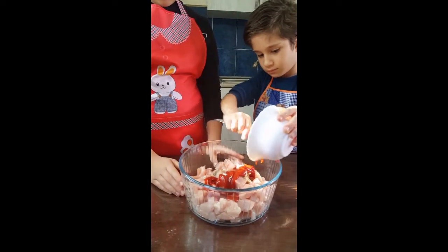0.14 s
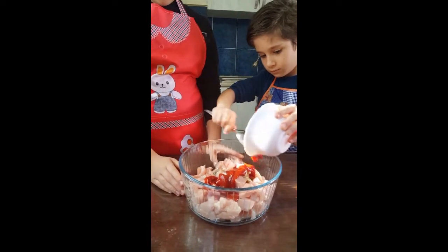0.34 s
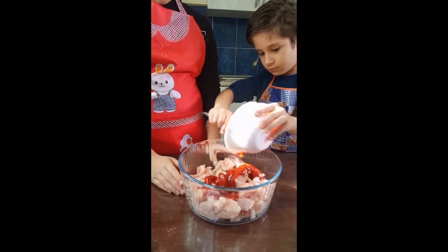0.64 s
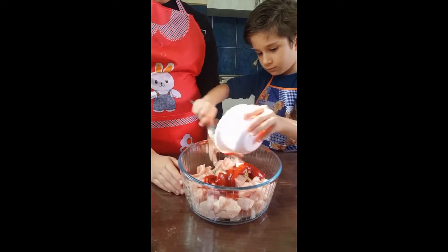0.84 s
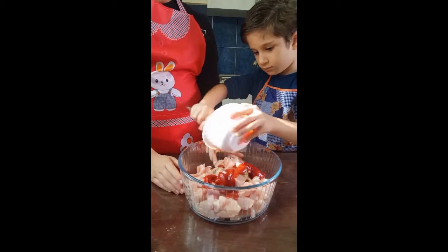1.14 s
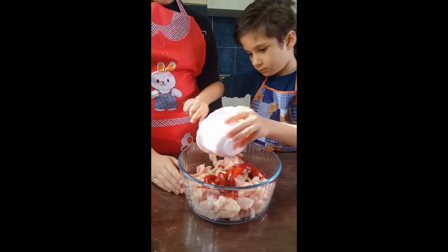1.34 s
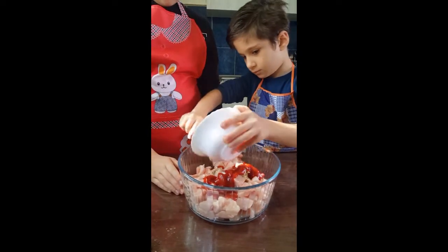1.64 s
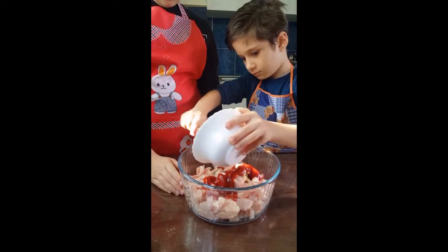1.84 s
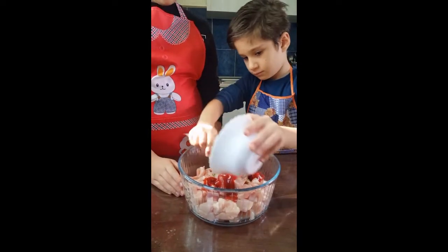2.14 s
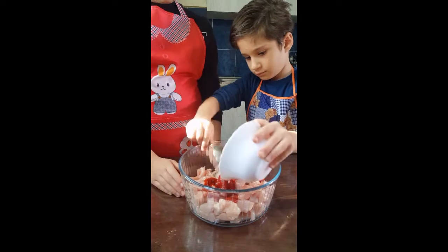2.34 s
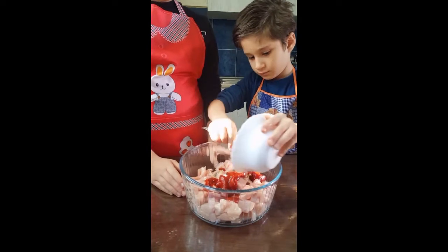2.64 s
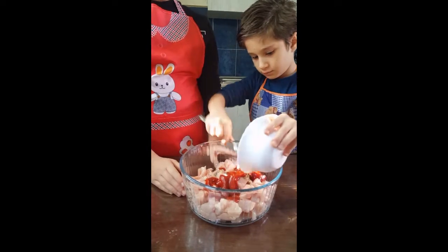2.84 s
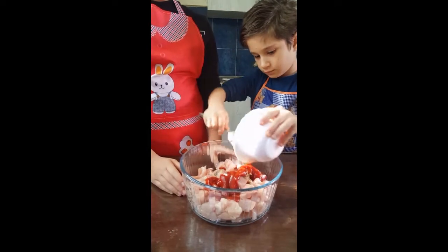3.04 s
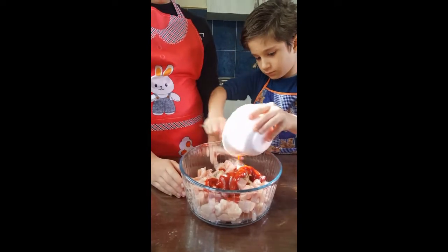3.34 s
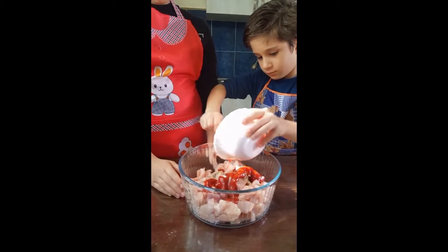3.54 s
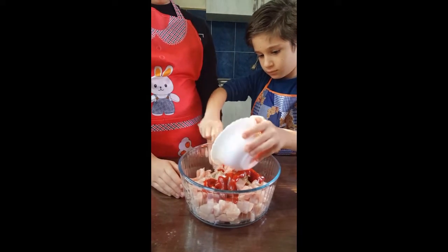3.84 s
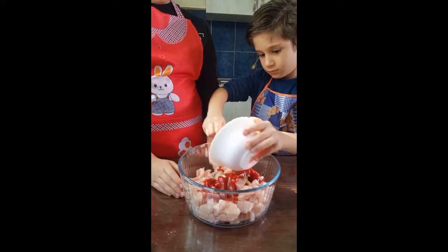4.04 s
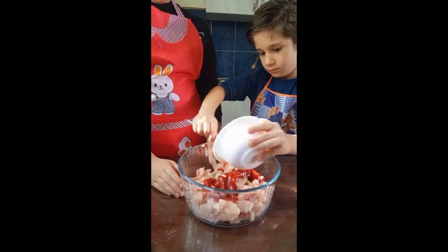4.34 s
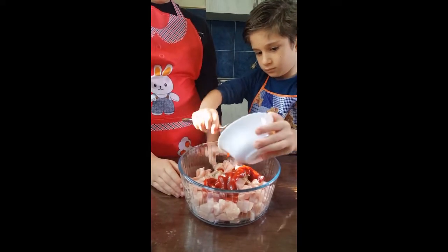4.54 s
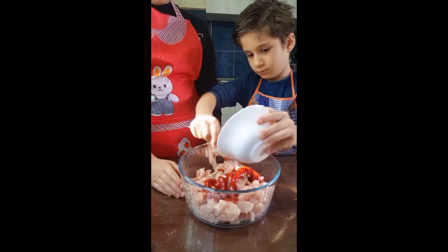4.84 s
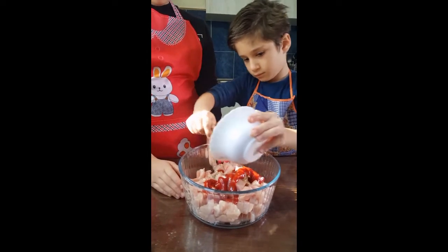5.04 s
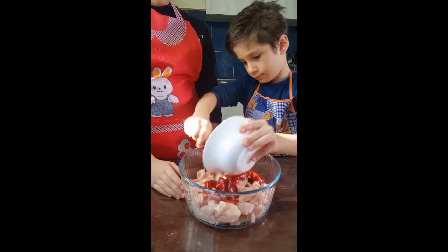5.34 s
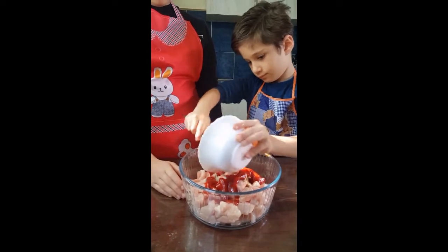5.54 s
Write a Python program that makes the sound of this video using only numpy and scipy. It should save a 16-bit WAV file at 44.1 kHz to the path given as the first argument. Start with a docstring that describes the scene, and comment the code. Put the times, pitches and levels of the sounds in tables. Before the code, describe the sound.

A close stereo phone pickup in a tiled home kitchen, about five and a half seconds. A faint, steady low appliance hum lies underneath. At 0.2-0.3 s a metal spoon knocks twice inside a hand-held china bowl, with short gritty scrapes, while a glass bowl on the table is nudged and rings low and soft. Single clear clinks follow at 0.7 and 1.2 s, a pair near 1.6, then two near 2.1-2.3, the second very faint. Light uneven taps cluster at 2.7-2.95, with a faint glass nudge at 3.0. Firm clinks come at 3.3, 3.8 (with a brighter rim ring near 3.2 kHz) and 4.2, with little scrapes around 3.5 and 4.3-4.45. A rapid clatter at 4.8 leads to the hardest knock at 4.94; double taps follow at 5.2 and 5.3, then a last light tap and scrape at 5.5. Rings are short and finger-damped, with quick hard-wall echoes and a half-second tail.

```python
"""A metal spoon taps and scrapes the inside of a hand-held china bowl in a tiled kitchen.
Each tap sums short damped body modes, longer rim modes and spoon modes; scrapes drive the same modes with gritty noise.
A glass bowl on the table, nudged early on and again midway, rings low as decaying sines.
Hard walls give two early echoes and a diffuse tail of about half a second; shaped noise makes the appliance hum."""
import sys
import numpy as np
from scipy import signal
from scipy.fft import rfft, irfft, next_fast_len
from scipy.io import wavfile
from scipy.ndimage import uniform_filter1d

SR = 44100
rng = np.random.default_rng(int(sys.argv[2]) if len(sys.argv) > 2 else 0)


def waveform_to_disk(signal):
    """Save audio, clipped to [-1, 1], as 16-bit WAV at the path in sys.argv[1]."""
    frames = np.transpose(np.atleast_2d(signal))
    scaled = np.clip(frames, -1, 1) * 32767
    samples = np.round(scaled).astype(np.int16)
    wavfile.write(sys.argv[1], SR, samples)


N = 251370
T = np.arange(SR // 2) / SR  # time axis of one ring, s

# Spoon taps: t/s, body/dB, rim/dB, spoon/dB (all relative), landing depth (scaled by family), rim ring f/Hz
TAPS = [(0.2251, -20, -41, -39.5, 3, 3120), (0.2929, -29, -25.5, -31.5, 5, 3213),
        (0.7198, -23, -17, -22.5, -5, 3202), (1.2156, -15.5, -15.5, -18, 2, 3240),
        (1.5705, -19.5, -33.5, -16.5, 7, 3299), (1.6841, -16.5, -17, -21, -2.5, 3278),
        (2.0951, -18.5, -26.5, -21, 6, 3190), (2.2985, -50, -43, -69.5, -9.5, 3160),
        (2.3095, -64, -39.5, -64, 3, 3230), (2.353, -45, -34, -52, 4, 3182),
        (2.6741, -31, -43.5, -22, 9.5, 3250), (2.73, -18.5, -31.5, -33, -1, 3310),
        (2.7695, -31, -34, -57, 2.5, 3246), (2.9345, -44, -29.5, -51, -11, 3250),
        (2.9458, -41, -32.5, -39, 0.5, 3240), (3.3038, -15.5, -20.5, -24.5, 3.5, 3240),
        (3.5031, -35.5, -28, -42, -8, 3180), (3.7646, -25.5, -9, -16.5, -7, 3239),
        (3.952, -45, -36, -58.5, -6.5, 3195), (4.229, -22.5, -14.5, -20, -4.5, 3214),
        (4.2594, -40, -34, -45, 5, 3300), (4.4514, -42, -28, -39, 4.5, 3237),
        (4.7879, -26, -16, -24.5, 3, 3219), (4.8031, -24, -42, -36, 1, 3270),
        (4.8344, -19, -21.5, -12.5, 7.5, 3400), (4.843, -22.5, -45, -27, 6, 3260),
        (4.938, -10.5, -17.5, -11.5, -3.5, 3190), (5.21, -18, -34, -13.5, 8.5, 3235),
        (5.218, -29, -50, -19, 7.5, 3235), (5.2943, -19.5, -26, -33, 2.5, 3250),
        (5.3026, -25.5, -36, -42, 3.5, 3270), (5.4993, -36, -22.5, -55, 0.5, 3195)]
# Modes of china bowl and spoon: family index, relative level/dB, free t60/s, left minus right/dB
CHINA_MODES = [(0, 3, 0.024, -2), (0, 4, 0.02, -7), (1, -2, 0.0083, -16.5), (1, 0.5, 0.022, 4.5),
               (1, 1.5, 0.014, -1.5), (2, 0.5, 0.026, -4.5), (2, 6, 0.019, 5.5), (2, 4, 0.013, -9.5),
               (3, -1.5, 0.084, 0), (3, -4, 0.031, 8.5), (4, -2, 0.041, 7.5), (4, -17.5, 0.1, -5),
               (5, -2, 0.052, 3.5), (5, -1, 0.014, 3), (6, -17, 0.02, 6), (6, -5.5, 0.043, 0.5),
               (6, -4.5, 0.022, 1), (6, -22, .01, 5), (7, -5, 0.12, 3.5), (8, -5, 0.048, 11.5),
               (8, -7, 0.055, -10), (9, 4, 0.018, 5), (9, 1, 0.017, 1.5), (9, -3.5, 0.027, 3),
               (10, 0, 0.0097, -5.5), (10, 2.5, 0.0042, 12.5)]
# Pitches of those modes: f/Hz (the rim mode is retuned by each tap)
CHINA_MODE_HZ = [300, 680, 1035, 1345, 1625, 2200, 2415, 2720, 3245, 3280, 5692, 5620, 8125, 7970, 12250,
                 13200, 11700, 13900, 1240, 8480, 9300, 3750, 4400, 5050, 6200, 7100]
RIM_MODE = 8  # index of the rim mode
# Mode families 0-10: thud, knock, clack, rim ring, upper ring, spoon ting, top fizz, bowl note, glaze ting, snap, tick
# Part voicing each family: 0 body, 1 rim, 2 spoon
FAMILY_PART = [0, 0, 0, 1, 1, 2, 2, 1, 2, 0, 2]
# Balance of each family: level over its part/dB, gain per unit of landing depth/dB
FAMILY_BALANCE = [(-11, 1.5), (1, 1.3856), (0, 0), (0.5, 0), (-3, -0.51), (-2.5, 0.28), (-5.5, -0.34),
                  (-6, 0.86), (-5.5, 0), (-7, 0.02), (-3, -0.84)]
# Spoon scrapes: t/s, length/s, level/dB, rim ring drive/dB, bowl note drive/dB, grit level scatter/dB
SCRAPES = [(0.269, 0.02, -29, -4, -13, 8), (0.37, 0.028, -35, -2.5, -14, 4.5),
           (0.52, 0.03, -65, -10, -16, 11.5), (2.919, 0.02, -47, 16, -2.5, 5.5),
           (3.207, 0.11, -61, -8, -10, -1), (3.475, 0.02, -30.5, 13.5, -8.5, 3),
           (3.508, 0.019, -40.5, -1.5, 5.5, 4), (3.903, 0.06, -46.5, 4, 5, 7),
           (4.305, 0.032, -50, 32, 8, 10.5), (4.403, 0.04, -36.5, 5.5, 2, 6),
           (4.432, 0.021, -44, -6.5, -5, 6), (5.489, 0.011, -52, 18, -11, 0),
           (5.497, 0.012, -29.5, 11, 0.5, 5.5)]
# Nudges of the glass bowl: t/s, level/dB, brightness about 500 Hz/(dB per octave)
NUDGES = [(.272, -25.5, 2.5), (.285, -26.5, -4), (.299, -32.5, -5), (.318, -29.5, -1.5), (.385, -38, 3),
          (3.013, -41, 1), (3.025, -43.5, -3)]
# Glass bowl modes: relative level/dB, t60/s
GLASS_MODES = [(-4.5, 0.087), (-1, 0.13), (-7.5, 0.12), (-1, 0.24), (-7.5, 0.38), (-7, 0.25), (-10, 0.25),
               (-7.5, 0.089), (1, 0.22), (-16, 0.12), (-30.5, .12)]
# Pitches of those modes: f/Hz
GLASS_MODE_HZ = [145, 258, 326, 560, 651, 694, 1190, 1507, 2078, 2105, 2713]
# Room tail bands: f/Hz, t60/s, relative level/dB
ROOM_BANDS = [(151, 0.73, -31.5), (406, 0.5, -36), (1090, 0.48, -35.5), (1900, 0.45, -38),
              (4350, 0.44, -36.5), (7800, 0.43, -41.5), (13200, 0.3, -38)]
# Echoes off table top and wall: left delay/s, level/dB
ECHOES = [(.0035, -15), (0.0121, -14.5)]
# Hum spectrum: f/Hz, relative density/dB
HUM_SPECTRUM = [(20, -25.5), (33, -23.5), (50, 2.5), (64, -14.5), (95, 5), (118, -7.5), (150, 0.5),
                (200, -5.5), (330, -4.5), (480, -15.5), (650, -8), (800, -16.5), (3200, -24), (4000, -33.5),
                (13500, -40), (14600, -41), (15000, -62.5)]
# Hum stereo: f/Hz, likeness of left and right (0-1)
HUM_LIKENESS = [(60, .85), (130, .93), (290, .92), (630, .1), (1380, .3), (3030, 0), (6630, .5), (14500, 0)]

HUM_MID_RMS_DB, TOP_HZ = -57.5, 15100
WALL_S, PORTS_APART_HZ, TAIL_LOW_HZ = 0.0037, 893, 176.5
EVEN_HZ = 40  # span of the finer spectral smoothing of the tail
GRIP, PAN_DB_PER_DEPTH = 0.77, 0.15  # share of free ring time left by the fingers; deep taps lie further left
FIRM_DB = -29.5  # taps whose loudest part is under this count as soft
SOFT_DB_PER_OCT, SOFT_GRIP = 0.86, 0.012  # lost per dB under firm: treble above the rim ring, share of ring time
SKID_DB, SKID_SCATTER_DB, SKID_DECAY_S, SKID_PER_S = -15.5, 4.5, 0.028, 230  # levels relative to the landing
CRACK_DB, CRACK_DECAY_S = -8.5, 0.0006  # level relative to the body


def amp(db):
    """Decibels to gain."""
    return 10 ** (np.asarray(db) / 20)


def add(out, s, x):
    """Mix x into out from time s."""
    i = int(s * SR)
    out[:, i:i + x.shape[-1]] += x[..., :N - i]


def tint(x, hz, gain):
    """Weigh the spectrum of x by gains joined on a log-frequency axis."""
    log_hz = np.log(np.fft.rfftfreq(x.shape[-1], 1 / SR) + 1)
    return irfft(rfft(x) * np.interp(log_hz, np.log(hz), gain), x.shape[-1])


def hum():
    """Appliance hum and room tone: shaped noise, its left-right likeness set by frequency."""
    mid, side = rng.standard_normal((2, next_fast_len(N)))
    hz, like = np.transpose(HUM_LIKENESS)
    like = np.clip(like, 0, 1)
    mid = tint(mid, hz, np.sqrt(1 + like))
    side = tint(side, hz, np.sqrt(1 - like))
    hz, db = np.transpose(HUM_SPECTRUM)
    left = tint(mid + side, hz, amp(db))
    right = tint(mid - side, hz, amp(db))
    out = np.array([left, right])[:, :N]
    return amp(HUM_MID_RMS_DB) * out / out.mean(axis=0).std()


def even(noise, fade):
    """Fade a noise out, levelling its fine spectral ripple to the broader average."""
    width = int(EVEN_HZ * len(fade) / SR)
    faded = rfft(noise * fade)
    power = np.abs(faded) ** 2
    broad = uniform_filter1d(power, size=12 * width) + 1e-12
    fine = uniform_filter1d(power, size=width) + 1e-12
    return irfft(faded * np.sqrt(broad / fine), len(fade)) * (fade > 1e-4)


def kitchen(dry):
    """Two early echoes plus a diffuse tail, held low until the walls answer; the ports share most of its bass."""
    t = np.arange(SR) / SR
    tail = np.zeros((2, len(t)))
    hz = np.transpose(ROOM_BANDS)[0]
    for k, (f, t60, db) in enumerate(ROOM_BANDS):
        mid, side = tint(rng.standard_normal(tail.shape), hz, np.arange(len(hz)) == k)
        side = side * min(f / PORTS_APART_HZ, 1)
        fade = np.exp(-np.log(1000) * t / t60)
        tail += amp(db) * even(np.array([mid + side, mid - side]), fade)
    tail *= (1 - np.exp(-t / 0.0012)) * np.where(t < WALL_S, .35, 1)
    tail = signal.sosfilt(signal.butter(2, TAIL_LOW_HZ, "high", fs=SR, output="sos"), tail)
    for delay_s, db in ECHOES:
        tail[0, int(delay_s * SR)] += amp(db)
        tail[1, int(delay_s * SR * 1.06)] += amp(db)  # right port hears it slightly later
    return dry + signal.fftconvolve(dry, tail, axes=1)[:, :N]


def ring(hz, db, t60, pan_db):
    """Struck modes as decaying sines; higher ones reach the right port out of step with the left."""
    right_slip = 1.71 * np.minimum(hz / 1400, 1) * rng.standard_normal(len(hz))
    slip_rad = np.array([0 * hz, right_slip])[..., None]
    gain = amp(db + np.array([pan_db, -pan_db]) / 2)[..., None]
    decay = np.exp(-np.log(1000) * T / t60[:, None])
    wave = np.sin(2 * np.pi * hz[:, None] * T + slip_rad) * decay
    # contact builds each mode up over about a cycle
    rise = np.sin(np.pi / 2 * np.minimum(T * hz[:, None] / 1.237, 1)) ** 2
    return np.sum(gain * wave * rise, axis=1)


def glass():
    """Soft nudges ring the glass bowl and the table under it."""
    out = np.zeros((2, N))
    hz = np.array(GLASS_MODE_HZ) * 1.
    db, t60 = np.transpose(GLASS_MODES)
    for s, level_db, bright_db in NUDGES:
        add(out, s, ring(hz, db + level_db + bright_db * np.log2(hz / 500), t60, 0 * hz))
    return out


def scrapes():
    """The spoon edge stutters over the glaze: gritty noise drives the modes, with the thud held down."""
    out = np.zeros((2, N))
    hz = np.array(CHINA_MODE_HZ) * 1.
    family, db, t60, lean_db = np.transpose(CHINA_MODES)
    family = np.round(family)
    for s, length_s, level_db, rim_db, note_db, grit_db in SCRAPES:
        n = int(length_s * SR)
        noise, scatter = rng.standard_normal((2, len(T)))
        # grit level jumps every 60 samples
        grit = noise * amp(grit_db * np.repeat(scatter, 60)[:len(T)])
        drive_db = rim_db * np.isin(family, (3, 4, 5)) + note_db * (family == 7)
        drive_db = drive_db - 36.0 * (family == 0) - 6.7 * np.log2(hz / 1000)
        body = ring(hz, db + drive_db, 0.55 * t60, lean_db)
        stroke = grit[:n] * np.hanning(n) ** .5
        sound = signal.fftconvolve(body, stroke[None], axes=1)
        add(out, s, amp(level_db) * sound / sound[:, :n].std())
    return out


def skid():
    """The landing, then a fading run of small uneven contacts as the spoon skids on."""
    t = T[:SR // 8]
    chance, size = rng.random(len(t)), rng.standard_normal(len(t))
    contact = chance < SKID_PER_S / SR
    out = contact * amp(SKID_DB + SKID_SCATTER_DB * size) * np.exp(-t / SKID_DECAY_S)
    out[0] = 1
    return out[None]


def crack(db):
    """First contact of metal and glaze: a brief snap of treble-tilted noise."""
    t = T[:SR // 100]
    return amp(db) * np.diff(rng.standard_normal((2, len(t) + 1))) * np.exp(-t / CRACK_DECAY_S)


def taps():
    """Body, rim and spoon voice their mode families; depth shifts the balance and the grip damps the ring."""
    out = np.zeros((2, N))
    family, db, t60, lean_db = np.transpose(CHINA_MODES)
    family = np.round(family).astype(int)
    over_db, db_per_depth = np.transpose(FAMILY_BALANCE)
    for s, *part_db, depth, rim_hz in TAPS:
        family_db = np.array(part_db)[FAMILY_PART] + over_db + db_per_depth * depth
        # well-damped modes move with the grip, long-ringing ones nearly stay put
        looseness = np.minimum(0.022 / t60, 1) ** 2
        hz = np.array(CHINA_MODE_HZ) * (1 + 0.051 * looseness * rng.standard_normal(len(db)))
        hz[RIM_MODE] = rim_hz
        soft_db = max(FIRM_DB - max(part_db), 0)
        dull_db = SOFT_DB_PER_OCT * soft_db * np.maximum(np.log2(hz / rim_hz), 0)
        held_t60 = t60 * np.clip(GRIP - SOFT_GRIP * soft_db, .05, 3)
        body = ring(hz, db + family_db[family] - dull_db, held_t60, lean_db + PAN_DB_PER_DEPTH * depth)
        add(body, 0, crack(part_db[0] + CRACK_DB))
        add(out, s, signal.fftconvolve(body, skid(), axes=1))
    return out


def scene():
    """Spoon and bowls in the kitchen, over hum; the bowls' sound carries no deep bass."""
    bowls = taps() + scrapes() + glass()
    near = signal.sosfilt(signal.butter(3, 110, "high", fs=SR, output="sos"), bowls)
    return kitchen(near) + hum()


def record(dry):
    """The phone clips at full scale, then cuts the top."""
    top_cut = signal.ellip(10, .2, 90, TOP_HZ, fs=SR, output="sos")
    return signal.sosfilt(top_cut, np.clip(dry, -1, 1))


dry = scene()
out = record(dry)
waveform_to_disk(out)
```